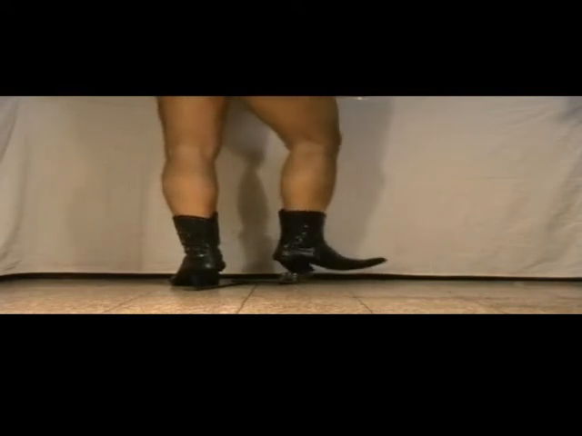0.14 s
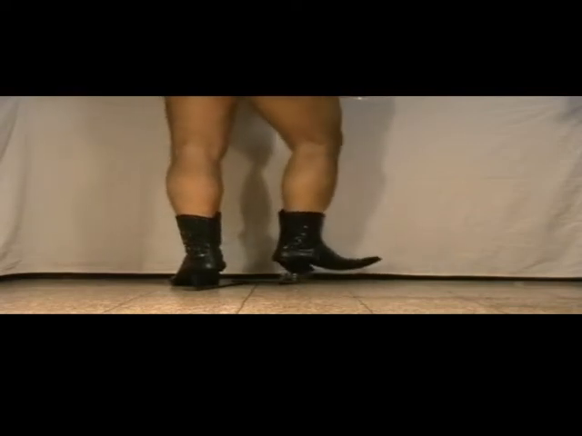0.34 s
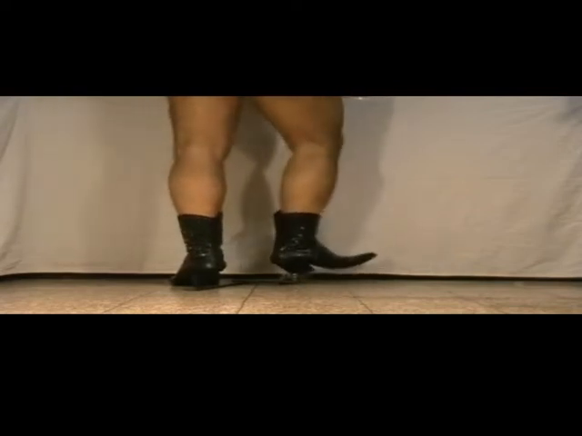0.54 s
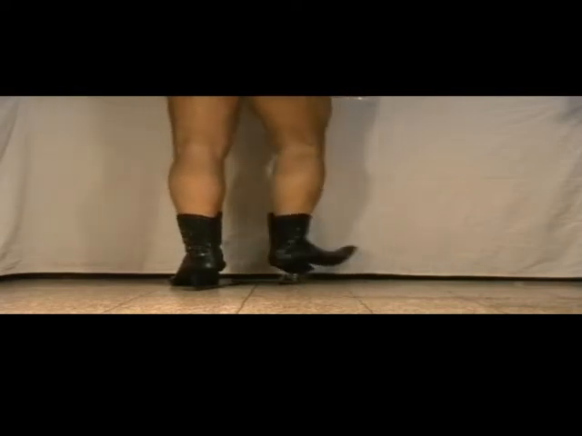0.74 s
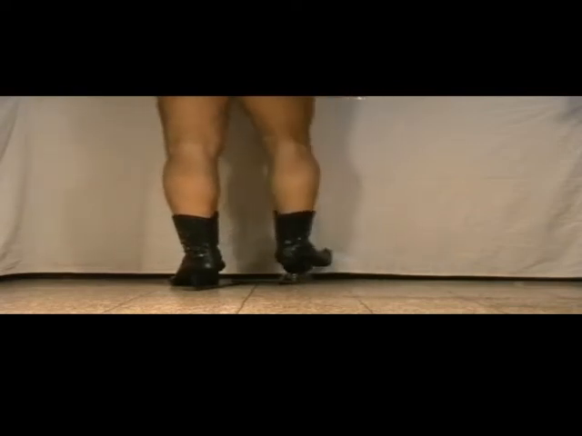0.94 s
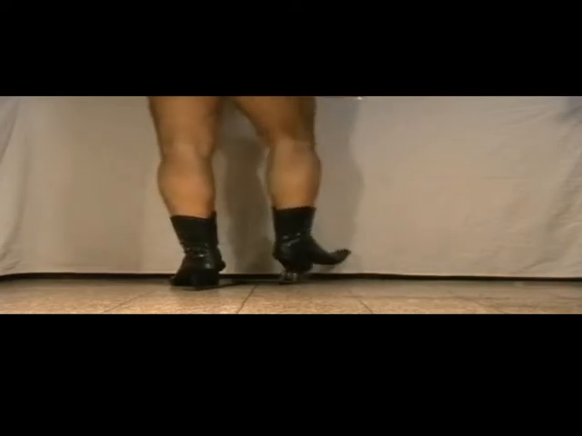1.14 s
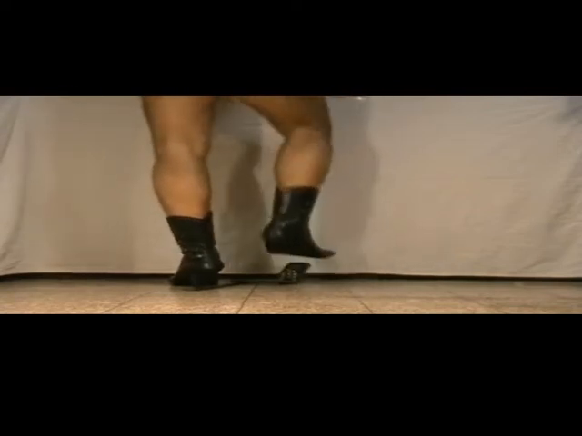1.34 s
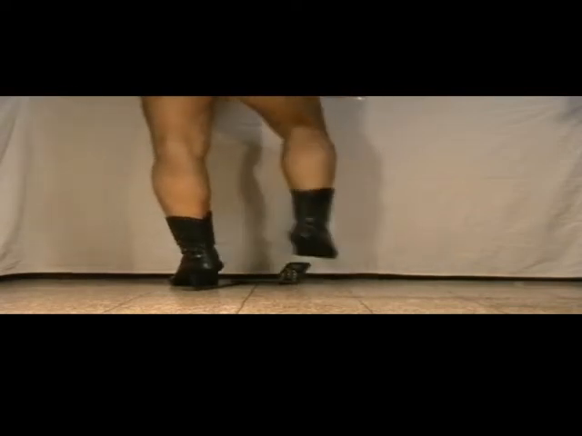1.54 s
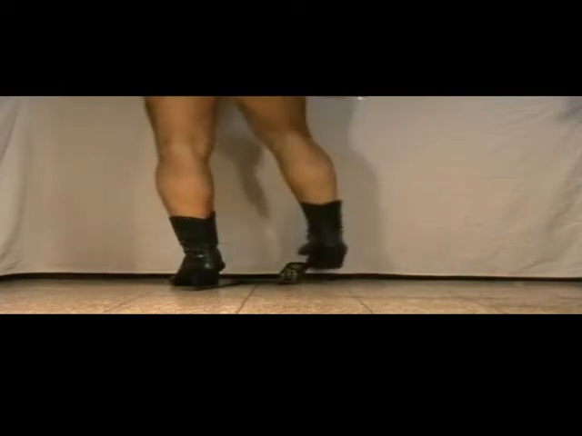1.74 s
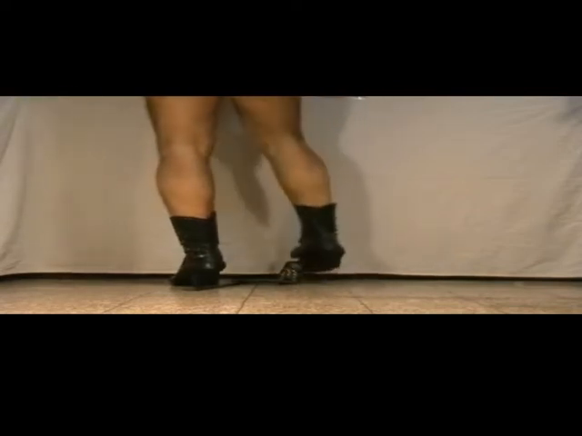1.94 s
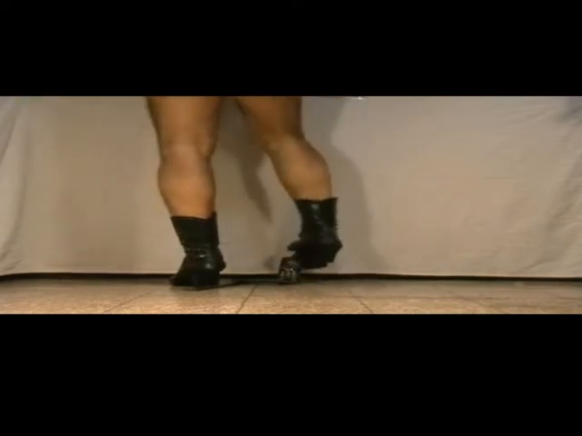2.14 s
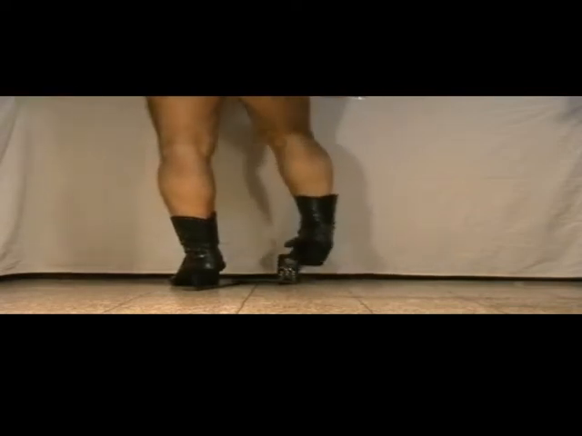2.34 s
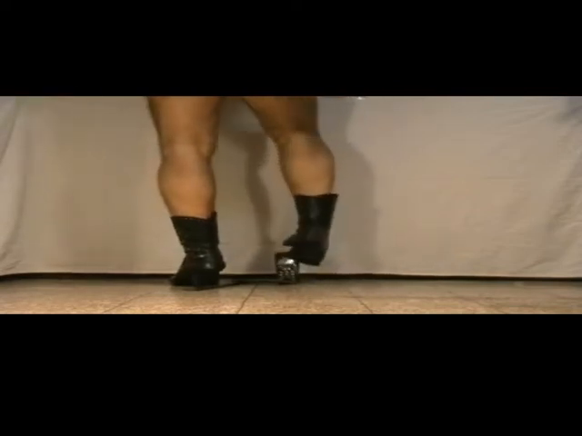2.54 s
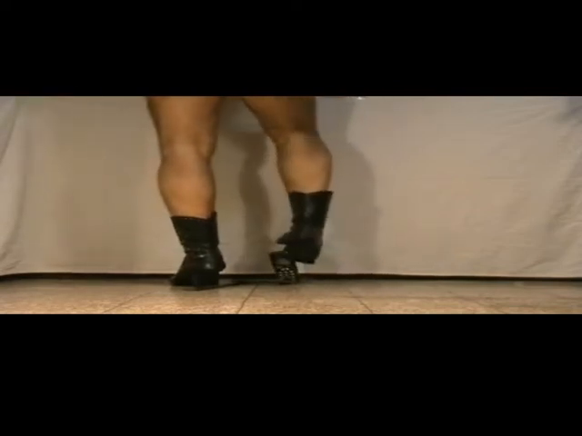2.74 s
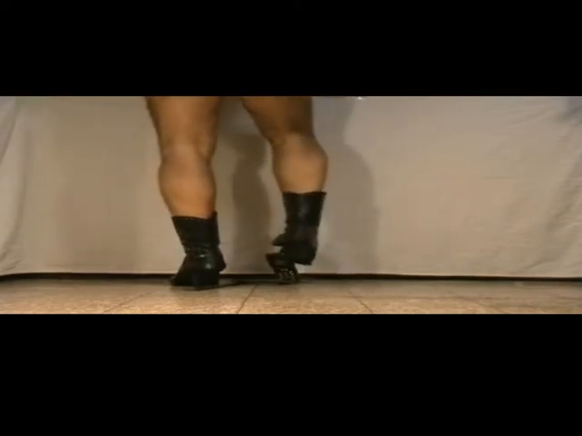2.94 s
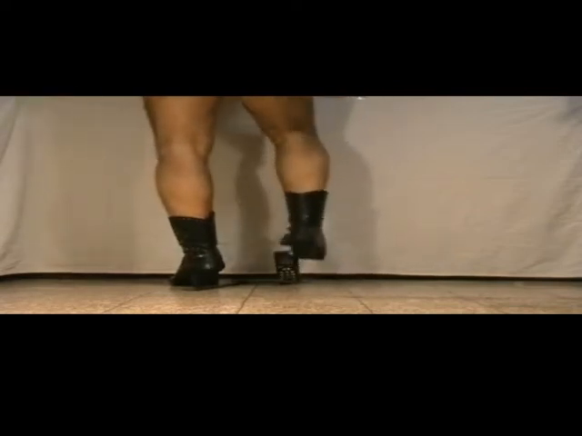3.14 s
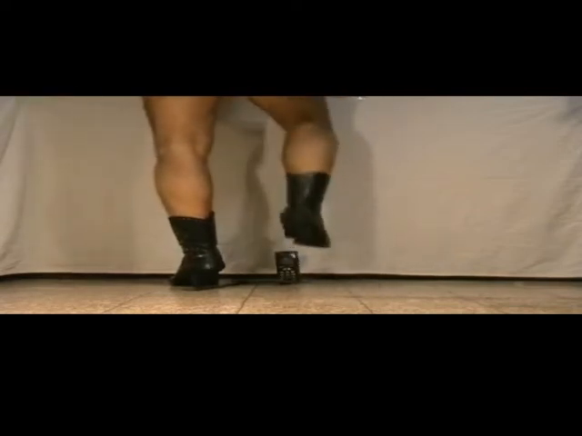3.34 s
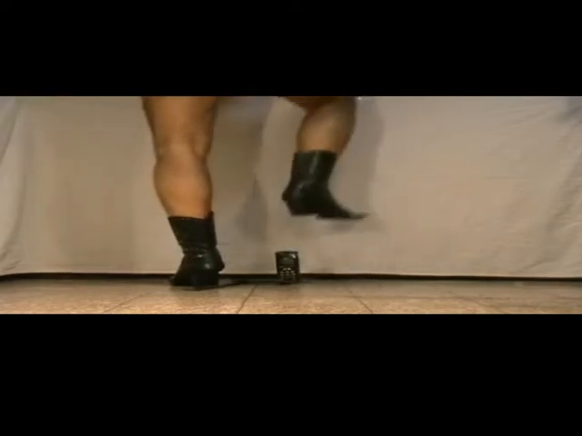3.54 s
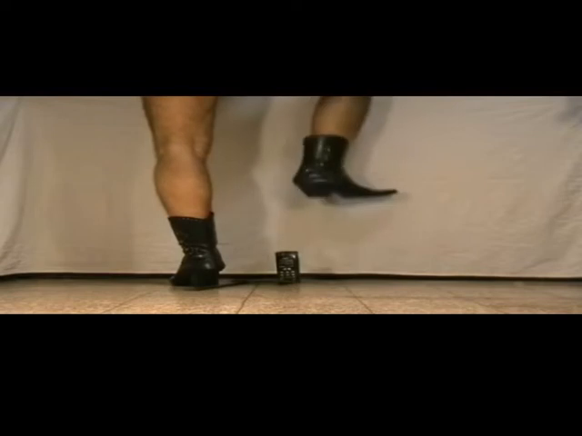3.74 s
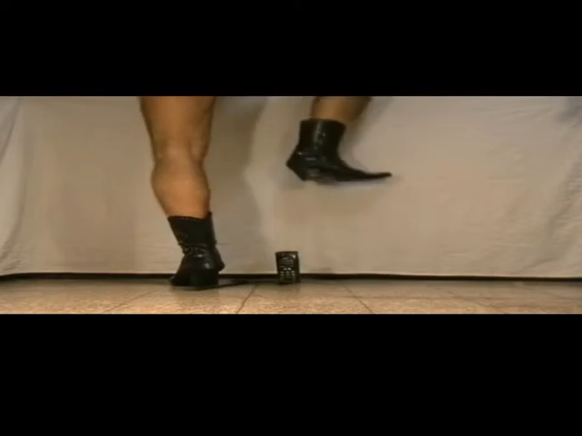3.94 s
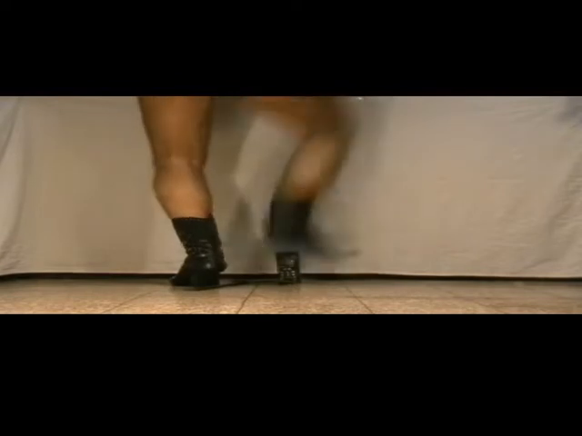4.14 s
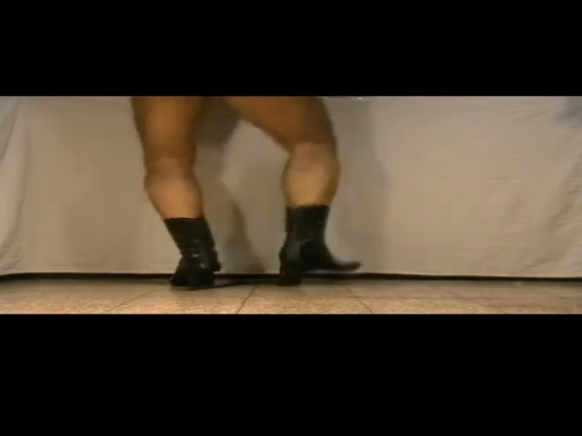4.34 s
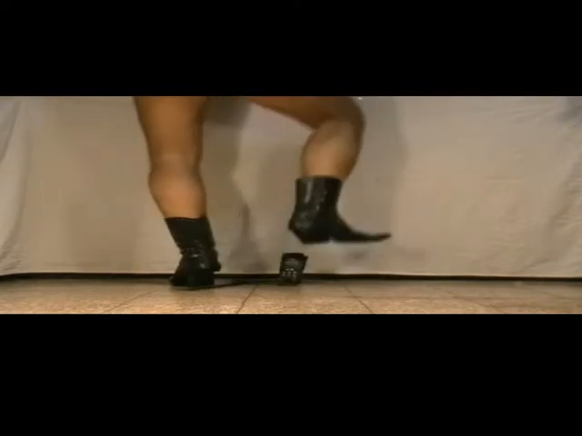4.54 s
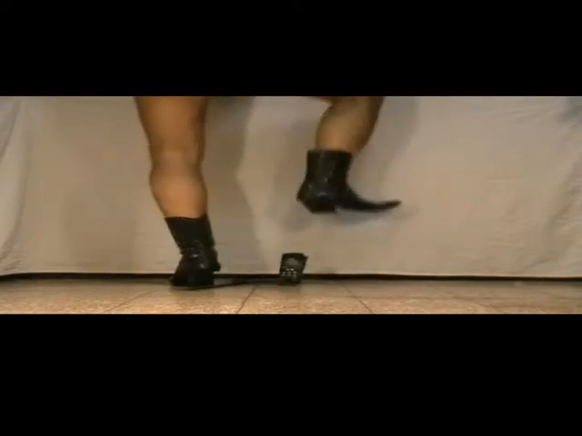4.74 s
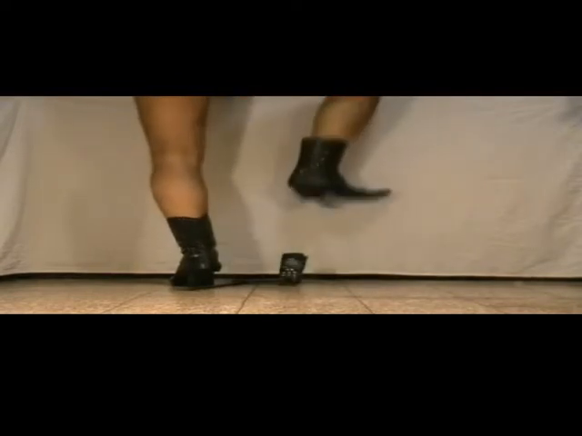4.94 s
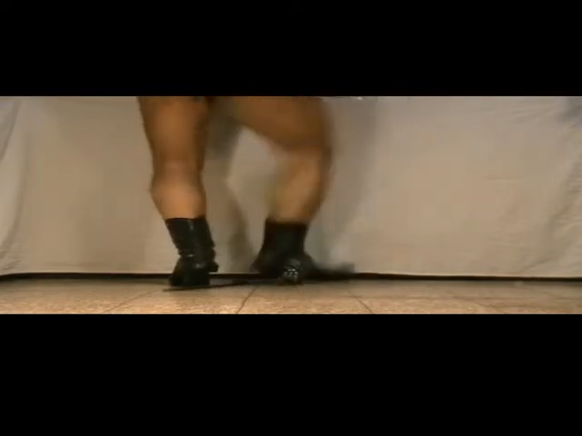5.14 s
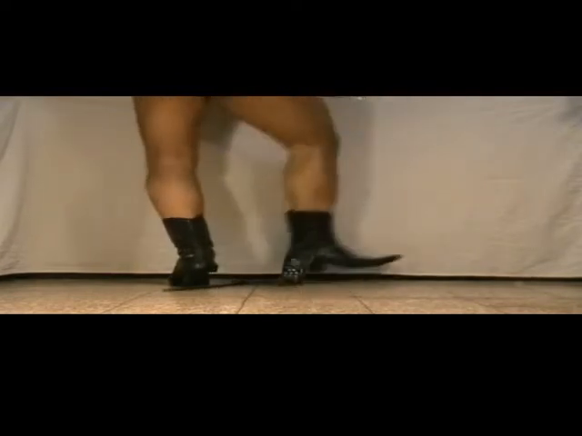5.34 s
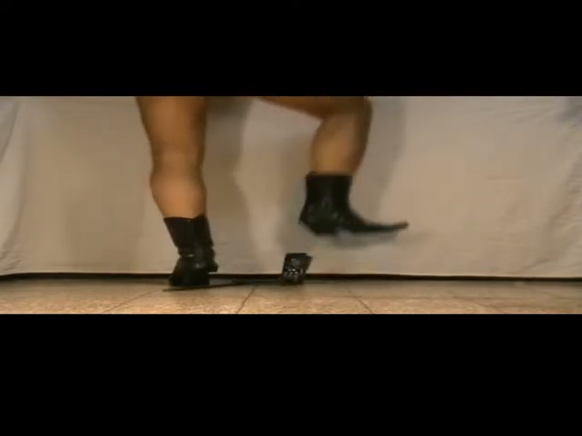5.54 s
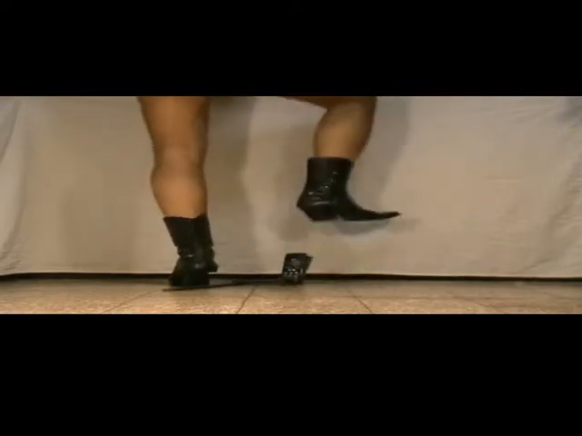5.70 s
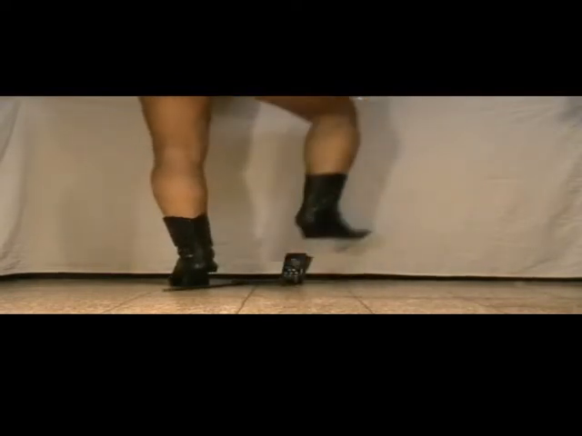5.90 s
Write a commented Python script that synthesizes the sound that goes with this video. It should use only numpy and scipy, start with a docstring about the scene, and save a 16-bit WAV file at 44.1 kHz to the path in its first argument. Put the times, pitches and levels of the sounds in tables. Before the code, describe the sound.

Sharp plastic snaps and gritty scuffs underfoot build to a burst of hard cracks, then two weighty heel stamps on tile.

```python
"""A boot heel grinds, flips and twice stamps on a plastic phone on a tiled floor in a small bare room.
First come scattered cracks and scuffs, then a burst of hard cracks from 2.4 to 2.9 s, and the two heavy
stamps near 4.1 and 5.0 s. Cracks are short noise bursts with a ring, crunches are dense grains, and heel
blows set low tones ringing. Room tone, a faint whine and a flickering hiss run throughout.
A camcorder listens: it rounds loud peaks and cuts notches at multiples of its drum rate; the top is dull."""
import sys
import numpy as np
from scipy import signal
from scipy.fft import rfft, irfft, next_fast_len
from scipy.io import wavfile

SR = 44100
rng = np.random.default_rng(int(sys.argv[2]) if len(sys.argv) > 2 else 0)


def persist_wave(psi):
    """Save psi, clipped to +-1, as 16-bit WAV."""
    counts = np.round(np.clip(psi, -1, 1) * 32767).astype(np.int16)
    wavfile.write(sys.argv[1], SR, np.atleast_2d(counts).T)


N = 263277  # length in samples

# Room tone spectrum, before the whole is set to its level: (pitch [Hz], relative level per Hz [dB])
AIR_SPECTRUM = [(28, -51.5), (40, -5), (50, 1), (64, -5), (92, -2.5), (120, -4.5), (160, -9), (250, 6),
                (330, -4), (600, -7.5), (780, -6.5), (2200, -12.5), (3300, -21), (9300, -27), (16000, -31)]
# How alike left and right are in the room tone: (pitch [Hz], likeness [-1 to 1])
AIR_LIKENESS = [(60, .75), (130, 0.87), (290, -.2), (640, -0.52), (1410, -0.013), (3100, -0.23),
                (6820, 0.6), (15000, -0.076)]
# Room tone level over time: (time [s], level [dB])
AIR_LEVEL = [(0.0, -56), (2.33, -56.5), (2.89, -55), (3.39, -58), (4.14, -58.5), (4.26, -46.5),
             (5.01, -60.5), (5.15, -52.5), (5.97, -55.5)]
# Steady tones of the drum whine: (pitch [Hz], average rms level [dB])
WHINE_TONES = [(450, -76), (750, -79), (1350, -80.5), (1950, -77), (2550, -81), (8400, -100.5), (8700, -89),
               (9000, -93)]
# Room tail by pitch: (pitch [Hz], relative level [dB], time to fall 60 dB [s], left-right likeness [-1 to 1])
ROOM_TAIL = [(50, -11, 2.1, .4), (112, -17, 1.3, 0.62), (261, -13, 0.43, 0.93), (700, -15, 0.41, 0.58),
             (1900, -15, 0.37, 0.66), (5050, -11.5, 0.34, 0.69), (12800, -15.5, 0.32, 0.77)]
# Echoes from near surfaces: (delay [ms], level against the direct sound [dB])
ECHOES = [(2.2, -25), (4.1, -17.5), (13.0, -13.5), (16.5, -17.5)]
# Floor and furniture that ring on after a thud: (pitch [Hz], relative level [dB], time to fall 60 dB [s])
FLOOR_MODES = [(51.55, -55.5, 1.4), (84.6, -60.5, 1.6), (109.2, -58, 1.5), (159, -64, .5),
               (366, -63.5, 2.7), (378, -65.5, 0.64), (850, -67, 1.5)]
# Heel block and the slab under it: (pitch [Hz], relative level [dB], time to fall 60 dB [s])
HEEL_MODES = [(103.7, -8.5, 0.26), (220.6, -4, 0.14), (232, -6, 0.11), (524, 1.4, 0.067), (656, -7, 0.072),
              (990, 2.5, 0.041), (1110, -8.5, 0.025)]
# Heel blows: (time [s], relative level [dB], favoured pitch [Hz], loss away from that pitch [dB per octave])
HEEL_BLOWS = [(0.843, -23.5, 910, 10), (0.903, -41, 955, 13), (2.395, -36, 975, 14), (2.642, -44, 800, 5),
              (2.857, -41.5, 600, -2), (2.951, -41.5, 100.5, 18), (3.16, -44, 142, 9.5),
              (4.104, -29, 716, -0.5), (4.142, -28.5, 750, 3), (4.204, -26.5, 101, 4.5),
              (5.022, -19, 530, 10), (5.102, -20, 330, 14), (5.123, -28.5, 252, -1), (5.15, -26, 540, 7.5),
              (5.165, -28.5, 199, 9)]
# Crunch and scuff under the sole: (peak time [s], peak level before the case [dB], swell [dB per s],
# fade [dB per s], dull part against the middle [dB], bright part against the middle [dB])
CRUNCHES = [(0.352, -49.5, 3000, 190, -11, -2.5), (0.62, -72.5, 5, 27, -4, -14),
            (0.85, -54, 200, 133, -5, -11), (1.09, -54, 223, 200, -23, -1.5), (1.36, -78, 25, 100, -9, -3),
            (1.75, -59, 1500, 72.5, -10, -10), (1.785, -65, 299.5, 124, -12.5, -11.5),
            (1.9, -66.5, 210, 400, -11.5, 2), (2.408, -42.5, 894.5, 268.5, -3.5, -15.5),
            (2.648, -32.5, 1603, 119, -13.5, -2), (2.868, -32.5, 1095.5, 150, -12.5, -7),
            (3.1, -60.5, 103, 196, -6.5, -1), (4.07, -62.5, 64.5, 302, -1.7, -2),
            (4.112, -34, 2200, 286, 5, 4), (4.193, -27.5, 598.5, 124, -8, -5), (4.85, -73, 195, 16, 10, -5),
            (5.031, -31.5, 1800, 107, -9.5, -8.5), (5.101, -38, 397, 122, 3.5, -11.5),
            (5.97, -74, 220, 100, -13, -10)]
# Resonances of the case and the tile under it: (pitch [Hz], width [Hz], boost or cut of this filter [dB])
CASE_RESONANCES = [(500, 120, -4.5), (960, 150, -1), (1530, 250, 1.5), (2057, 180, 4), (2550, 180, 3.5),
                   (3555, 500, 1.5), (3910, 1200, 1), (5920, 700, 0.5), (8500, 3080, 6)]
# Cracks and knocks: (time [s], relative crack level [dB], heft against the crack [dB],
# brightness against the crack [dB], ring pitch [Hz], time constant of the noise [ms])
CRACKS = [(0.1595, -59, 4, 10.5, 836, 4.8), (0.2328, -53, -10, -2, 4000, 3),
          (0.3455, -26.5, -26.5, -3.5, 1540, 4.6), (0.4389, -15, -22.5, -5, 1990, 4.1),
          (0.5856, -54.5, -20, 12, 3770, 3.3), (0.636, -34.5, -28, -6, 3760, 2.8),
          (0.679, -43.5, -19, 0, 1980, 3.8), (0.7258, -38.5, -8, -12.5, 2070, 11),
          (0.746, -47, -6, 6.5, 1380, 3), (0.7878, -54, -18, 8, 3140, 3.0),
          (0.824, -26.5, -23, 4, 1510, 1.45), (0.84, -25, -2, -7.5, 980, 8),
          (0.9974, -50, -18, 13, 1020, 1.4), (1.074, -57, -20, -3, 3320, 2.3),
          (1.099, -33, -17.5, 2.5, 3920, 4.4), (1.299, -49, -17, -3.5, 1580, 6),
          (1.3115, -51, -18.5, -5, 2030, 9.2), (1.3486, -48.5, -10.5, 3, 4400, 3.1),
          (1.3613, -45, -15, -9, 3140, 1.8), (1.5309, -44, -9, -2, 4670, 2),
          (1.7677, -41, -12.5, -10, 2790, 6.7), (1.845, -40, -23, -3, 3120, 2.2),
          (1.874, -49, -18.5, -5, 4000, 2.2), (1.8865, -31, -30.5, -3.5, 2300, 1.8),
          (2.0718, -51.5, -16.5, 0.5, 2590, 3.8), (2.138, -42, -18, -2.5, 2200, 3.7),
          (2.1702, -58.5, -16, 10, 2010, 3.1), (2.3518, -45, -1, -1, 3200, 1.6),
          (2.394, -13, -18, -11.5, 1900, 3.4), (2.553, -56.5, -10, 11, 6000, 2.2),
          (2.5761, -55, -9.5, 8, 510, 4), (2.608, -45.5, -1.3, 6, 2500, 2.3),
          (2.6394, -5.5, -16, -5.5, 3230, 2.24), (2.6939, -16.5, -18.5, 1.2, 8800, 3.25),
          (2.7559, -29.5, -14.5, 1, 2690, 2.2), (2.7834, -31, -22.5, -7, 4870, 4.5),
          (2.8368, -38.5, -7.5, 9, 3090, 2.3), (2.8557, -2.5, -15.5, -11.5, 2150, 3.4),
          (2.9033, -17, -19.5, -5.5, 1660, 5.1), (3.078, -36, -17, -4.5, 3220, 3.2),
          (3.1574, -48, -12.5, -14, 2200, 3.0), (3.3572, -60, -1, 3.5, 460, 3.7),
          (4.1026, -6.5, -0.5, -12, 2900, 2.6), (4.1045, -6, -10.5, -4, 2550, 3.2),
          (4.1113, -32.5, -8, -8, 1980, 1.1), (4.133, -16, -22, -8, 3460, 0.93),
          (4.1407, -13, -6, 5, 5970, 1.75), (4.1499, -16, -8, -1.5, 5750, 3.1),
          (4.1633, -22.5, -8.5, 8.5, 4400, 2.6), (4.5502, -53.5, 0, -7, 790, 6.5),
          (4.7985, -44.5, -9, -4, 1170, 11.6), (4.8889, -39.5, -18, 2, 7000, 4.2),
          (5.02, -3.5, -7, -4.5, 1474, 3.84), (5.0278, -9, -17.5, 3, 3600, 1.4),
          (5.0378, -24, -11, -13, 2480, 1), (5.0998, -16.5, -1, 0.7, 496, 2.5),
          (5.1075, -21, 0.5, -4.5, 1330, 6.3), (5.139, -21.5, -5.5, -17, 620, 3.5),
          (5.9274, -53, 2.5, -14, 837, 5.2)]
# Boom, thud, knock, crack, snap and edge bands: (low edge [Hz], high edge [Hz], gain [dB])
CRACK_COLOURS = [(65, 200, 24.5), (135, 330, 21), (399, 1080, 12.5), (1160, 3300, 3.5), (3340, 6260, 5),
                 (7500, 21000, -2.5)]

# a narrow hiss; flicker is the spread of its level
HISS_HZ, HISS_WIDTH_HZ, HISS_DB, HISS_FLICKER_DB = 9400, 1300, -82, 6.5
HEEL_CHANCE_DB = 3  # random spread of each heel mode
GRAINS_PER_S, GRAIN_SPREAD_DB = 2200.0, 4  # grain rate before it wanders; scale of the uneven sizes
# boom and thud start from these offsets and grow with the heft (dB per dB)
BOOM_DB, BOOM_FOLLOWS, THUD_DB, THUD_FOLLOWS = -27, .6, -10, 1.3
EDGE_DB = 0  # glassy edge against the snap
RING_DB, RING_FOLLOWS = -2, -0.17  # offset from the crack; harder cracks ring less in proportion (dB per dB)
RING_CYCLES = 2.4  # the ring loses about 9 dB in this many cycles
RISE_MS = 0.44  # time constant of the contact build-up
OVERLOAD = 0.72  # ceiling of the rounded peaks
BASS_LEAN, BASS_LEAN_HZ = 0.2, 250  # share of bass added on the left and taken from the right
DRUM_LAG = 147  # samples, which is 300 Hz
NOTCH_MEMORY, NOTCH_TOP_HZ = 0.84, 6000  # more memory is narrower; notches weaken towards the treble
TREBLE_SHELF_HZ, CUTOFF_HZ = 15700, 16800  # stop edges of the gentler and the stronger treble cut


def from_db(db):
    """Turn decibels into gain."""
    return 10 ** (np.asarray(db) / 20)


def rms_one(x):
    """Scale to an rms of 1."""
    return x / np.sqrt(np.mean(x ** 2) + 1e-20)


def band(x, low, high, order=2):
    """Keep the pitches between two edges with a Butterworth filter."""
    sections = signal.butter(order, [low, high], "band", fs=SR, output="sos")
    return signal.sosfilt(sections, x + 1e-18)


def at_hz(rows, hz, column=1):
    """Read a table at any pitch, in straight lines over log pitch."""
    table = np.array(rows)
    return np.interp(np.log(hz), np.log(table[:, 0]), table[:, column])


def drift(rate):
    """Random wandering with a spread of 1; a higher rate in Hz wanders faster."""
    knots_per_s = 40
    knots = rng.standard_normal(int(N / SR * knots_per_s) + 2)
    memory = np.exp(-2 * np.pi * rate / knots_per_s)
    smooth = rms_one(signal.lfilter([1], [1, -memory], knots))
    return np.interp(np.arange(N) / SR * knots_per_s, np.arange(len(knots)), smooth)


def half_octaves():
    """Band edges half an octave apart, from the bass to the top."""
    edges = 32 * 2 ** np.arange(0, 9.6, .5)
    return list(zip(edges, np.minimum(edges[1:], .45 * SR)))


def stereo_pair(white, alike):
    """Mix a shared noise and an opposed noise, so left and right are as alike as asked."""
    alike = np.clip(alike, -.99, .99)
    shared = np.sqrt(1 + alike) * white[0]
    opposed = np.sqrt(1 - alike) * white[1] * np.array([[1], [-1]])
    return shared + opposed


def ring(clicks, hz, t60):
    """A resonance: each unit click starts a dying sine of height 1."""
    r, w = from_db(-60 / (t60 * SR)), 2 * np.pi * hz / SR
    return signal.lfilter([0, np.sin(w)], [1, -2 * r * np.cos(w), r * r], clicks + 1e-18)


def narrow_hiss():
    """One treble band of flickering noise, unrelated in the two channels."""
    white = rng.standard_normal((2, N))
    hiss = band(white, HISS_HZ - HISS_WIDTH_HZ / 2, HISS_HZ + HISS_WIDTH_HZ / 2)
    return from_db(HISS_DB + HISS_FLICKER_DB * drift(8)) * rms_one(hiss)


def drum_whine(t):
    """Steady sines whose levels waver slightly."""
    total = 0
    for hz, db in WHINE_TONES:
        level = from_db(db + drift(3))
        # the root of 2 turns an rms level into a sine height
        total = total + level * np.sqrt(2) * np.sin(2 * np.pi * (hz * t + rng.random()))
    return total


def room_tone():
    """Soft flickering noise bands that follow the level table, plus the drum whine."""
    white, air = rng.standard_normal((2, 2, N)), 0
    for k, (low, high) in enumerate(half_octaves()):
        hz = np.sqrt(low * high)
        level = from_db(at_hz(AIR_SPECTRUM, hz) + 1.1 * drift(6))
        # two noises take turns, so neighbouring bands are unrelated
        air = air + level * stereo_pair(band(white[k % 2], low, high), at_hz(AIR_LIKENESS, hz))
    t = np.arange(N) / SR
    times, levels = np.transpose(AIR_LEVEL)
    return from_db(np.interp(t, times, levels)) * rms_one(air) + drum_whine(t)


def room(direct, to_walls):
    """Direct sound with a few echoes, and a noise tail that builds up fast and dies band by band."""
    t = np.arange(SR) / SR
    white, tail = rng.standard_normal((2, 2, SR)), 0
    for k, (low, high) in enumerate(half_octaves()):
        hz = np.sqrt(low * high)
        fall_db = 60 * t / at_hz(ROOM_TAIL, hz, column=2)
        shape = from_db(at_hz(ROOM_TAIL, hz) - 19.5 - fall_db) * (1 - np.exp(-t / 0.0018))
        tail = tail + stereo_pair(band(white[k % 2], low, high), at_hz(ROOM_TAIL, hz, column=3)) * shape
    early = np.zeros((2, SR // 20))
    early[:, 0] = 1  # the direct sound
    for k, (ms, db) in enumerate(ECHOES):
        for side in (0, 1):
            far = (k + side) % 2  # the far side hears the echo one sample later
            early[side, round(ms / 1000 * SR) + far] += from_db(db)
    near = signal.fftconvolve(direct[None], early, axes=1)[:, :N]
    return near + signal.fftconvolve(to_walls[None], tail, axes=1)[:, :N]


def floor_ring(thuds):
    """Resonances of floor and furniture, set ringing by the thuds."""
    return sum(from_db(db) * ring(thuds, hz, t60) for hz, db, t60 in FLOOR_MODES)


def heel():
    """Each blow strikes every mode of the heel, weighted around the pitch that its landing favours."""
    times, db, favoured_hz, loss = np.transpose(HEEL_BLOWS)
    chance = HEEL_CHANCE_DB * rng.standard_normal((len(HEEL_BLOWS), len(HEEL_MODES)))
    out = 0
    for (hz, mode_db, t60), luck in zip(HEEL_MODES, chance.T):
        octaves_away = np.abs(np.log2(hz / favoured_hz))
        clicks = np.zeros(N)
        clicks[np.round(times * SR).astype(int)] = from_db(db + mode_db - loss * octaves_away + luck)
        out = out + band(ring(clicks, hz, t60), hz / 2, 2500)  # a blunt contact has no sharp edge
    return out


def crunch():
    """Dense uneven grains while the sole loads, drags or scatters pieces; each spell swells and fades."""
    sizes = from_db(GRAIN_SPREAD_DB * np.minimum(rng.exponential(1, N), 4))
    signed = sizes * rng.choice([-1, 1], N)
    grains = signed * (rng.random(N) < GRAINS_PER_S * from_db(2.5 * drift(12)) / SR)
    dull = rms_one(band(grains, 150, 1044, order=3))
    middle = rms_one(band(grains, 1200, 6370, order=3))
    bright = rms_one(band(grains, 4500, 21600, order=3))
    t, out = np.arange(N) / SR, 0
    for s, db, swell, fade, dull_db, bright_db in CRUNCHES:
        level = from_db(db - np.where(t < s, swell * (s - t), fade * (t - s)))
        out = out + level * (middle + from_db(dull_db) * dull + from_db(bright_db) * bright)
    return out


def case_colour(x):
    """Peaking filters: the case and the tile under it colour the sound with short resonances."""
    for hz, width, db in CASE_RESONANCES:
        r = np.exp(-np.pi * width / SR)
        feedback = [1, -2 * r * np.cos(2 * np.pi * hz / SR), r * r]
        peak = signal.lfilter(np.array([1, 0, -1]) * (1 - r * r) / 2, feedback, x)
        x = x + (from_db(db) - 1) * peak
    return x


def split_colours(layers):
    """Filter each of the six layers into its own colour band."""
    return np.array([from_db(db) * band(layer, low, high, order=3)
                     for layer, (low, high, db) in zip(layers, CRACK_COLOURS)])


def cracks():
    """Contacts: dying noise in six colours and a short ring; the walls get clicks of like energy."""
    t, colour = np.arange(2000) / SR, np.arange(6)
    noise = rng.standard_normal((len(CRACKS), 2, len(t)))
    bursts, clicks, rings = np.zeros((6, N + len(t))), np.zeros((6, N)), np.zeros(N + len(t))
    rise = 1 - np.exp(-t / (RISE_MS / 1000))
    for (s, db, heft, bright, ring_hz, ms), pair in zip(CRACKS, noise):
        i = round(s * SR)
        shape = rise * np.exp(-(t / (ms / 1000)) ** 0.99)  # almost a plain exponential decay
        boom, thud = BOOM_DB + BOOM_FOLLOWS * heft, THUD_DB + THUD_FOLLOWS * heft
        gains = from_db(db + np.array([boom, thud, heft, 0, bright, bright + EDGE_DB]))
        bursts[:, i:i + len(t)] += gains[:, None] * pair[colour % 2] * shape
        clicks[:, i] += gains * np.sqrt(np.sum(shape ** 2))
        ring_level = from_db(db + RING_DB + RING_FOLLOWS * db)
        ring_shape = rise * np.exp(-t * ring_hz / RING_CYCLES)
        rings[i:i + len(t)] += ring_level * ring_shape * np.sin(2 * np.pi * ring_hz * t)
    return split_colours(bursts[:, :N]), split_colours(clicks), rings[:N]


def scene():
    """Contacts through the case and the room, over the floor ring, room tone and hiss."""
    bursts, clicks, rings = cracks()
    grains, knocks = crunch(), heel()
    direct = case_colour(bursts.sum(0) + grains + rings)
    to_walls = case_colour(clicks.sum(0) + grains + from_db(-1.5) * rings)
    heard = room(direct + knocks, to_walls + from_db(-8.0) * knocks) * from_db([[-.2], [.2]])
    # boom minus thud drives the floor, a little louder on the left
    floor = floor_ring(clicks[0] - clicks[1]) * from_db([[1.2], [-1.2]])
    return heard + floor + room_tone() + narrow_hiss()


def record(dry):
    """Round the peaks, lean the bass left, subtract what repeats at the drum rate and cut the top."""
    x = OVERLOAD * np.tanh(dry / OVERLOAD)
    bass = signal.lfilter(*signal.butter(1, BASS_LEAN_HZ, fs=SR), x)
    x = x + BASS_LEAN * np.array([[1], [-1]]) * bass
    size = next_fast_len(N + SR)
    hz = np.fft.rfftfreq(size, 1 / SR)
    lag = np.exp(-2j * np.pi * hz * DRUM_LAG / SR)  # a delay of one drum period
    repeats = (1 - NOTCH_MEMORY) * lag / (1 - NOTCH_MEMORY * lag)  # running average over past periods
    repeats = repeats / (1 + (hz / NOTCH_TOP_HZ) ** 4)
    x = irfft(rfft(x, size) * (1 - repeats), size)[:, :N]
    x = signal.sosfilt(signal.cheby2(8, 22, TREBLE_SHELF_HZ, fs=SR, output="sos"), x)
    return signal.sosfilt(signal.cheby2(12, 60, CUTOFF_HZ, fs=SR, output="sos"), x)


dry = scene()
out = record(dry)
persist_wave(out)
```